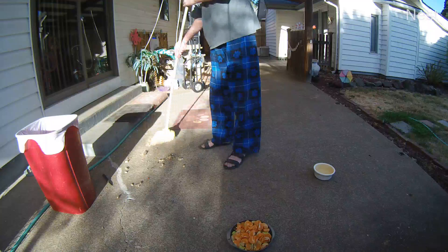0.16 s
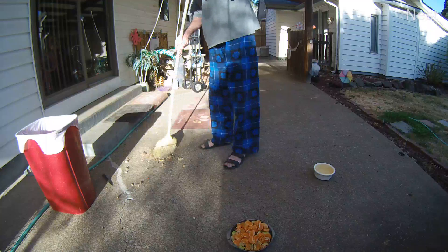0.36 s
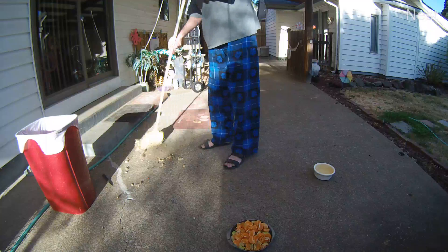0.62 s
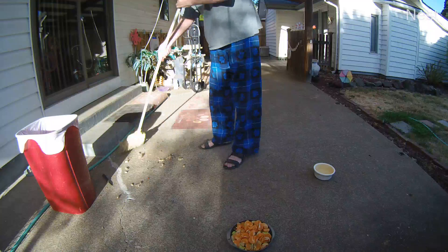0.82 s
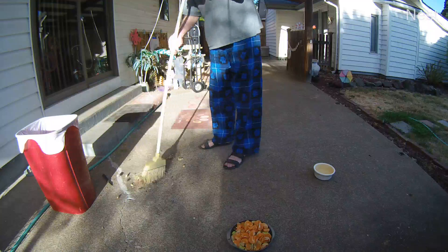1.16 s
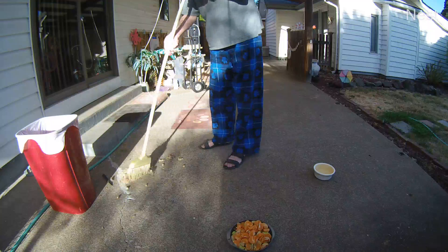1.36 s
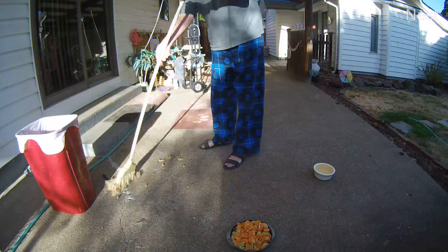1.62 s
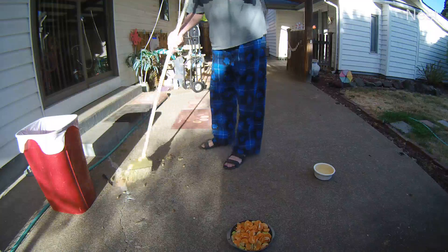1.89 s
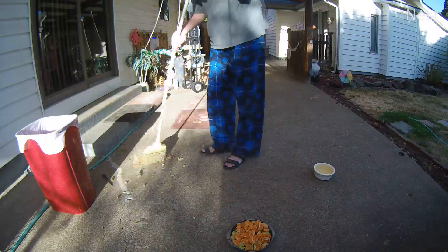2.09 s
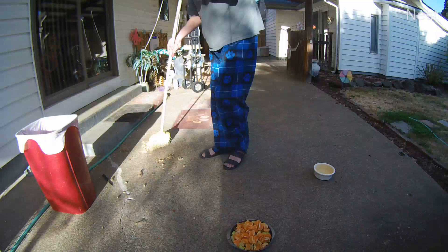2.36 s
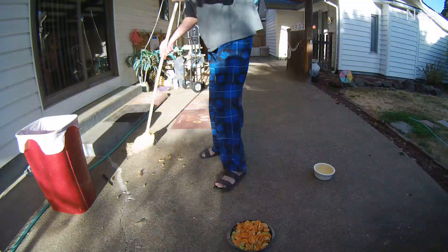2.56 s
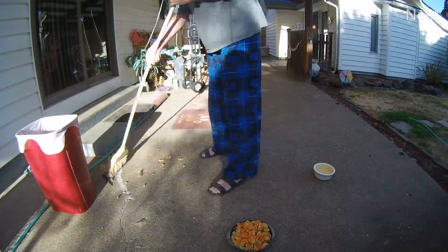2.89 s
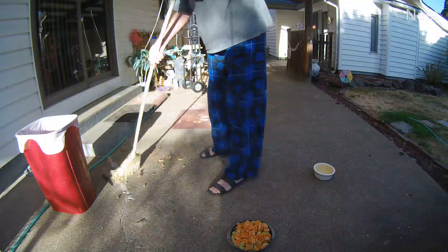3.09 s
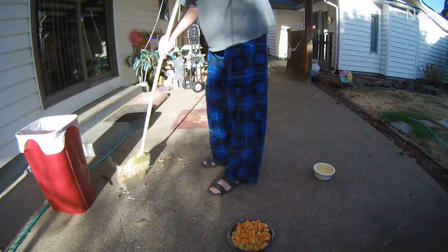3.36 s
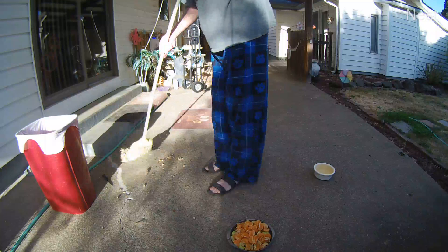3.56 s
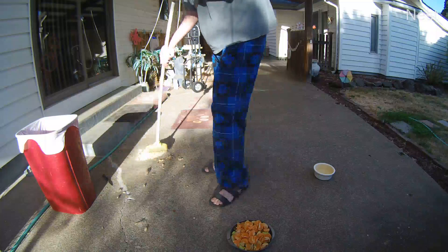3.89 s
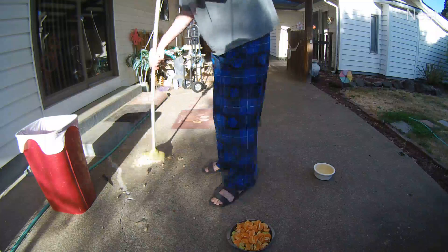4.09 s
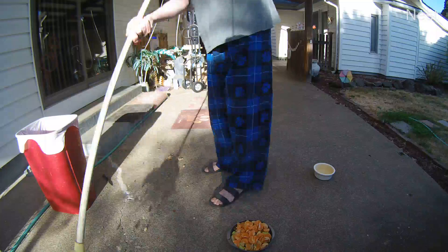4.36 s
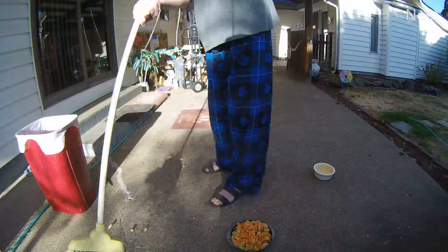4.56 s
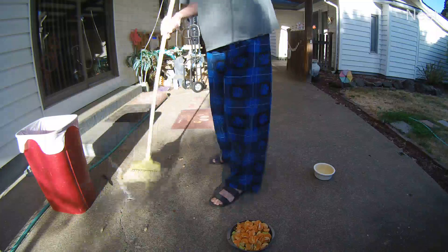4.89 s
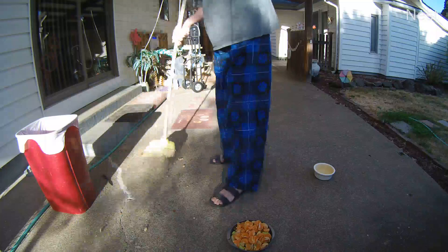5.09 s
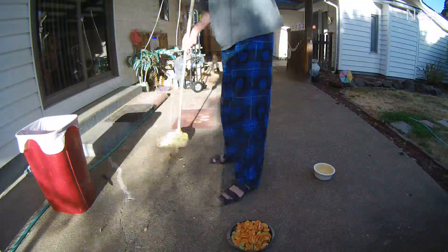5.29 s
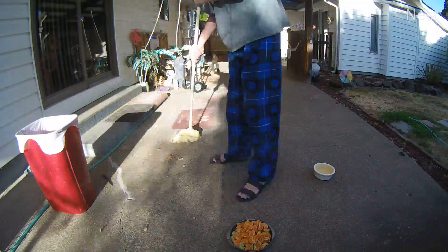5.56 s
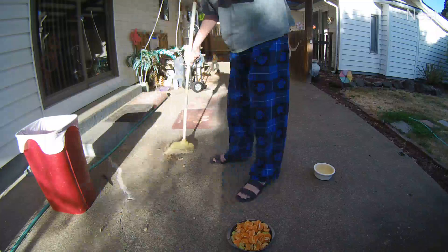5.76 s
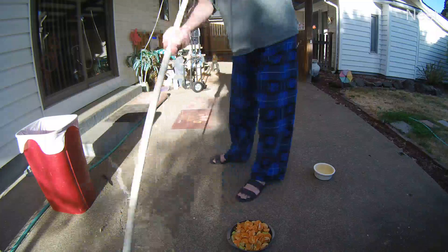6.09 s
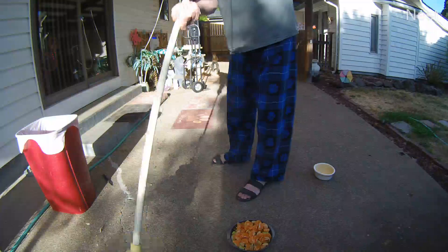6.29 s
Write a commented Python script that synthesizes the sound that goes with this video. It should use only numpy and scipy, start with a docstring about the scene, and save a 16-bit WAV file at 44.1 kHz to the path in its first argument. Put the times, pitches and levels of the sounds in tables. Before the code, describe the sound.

Dry, bright bristle scratches on concrete, first smooth sweeps, then irregular jabs with crackling grit clicks, against a faint airy background.

```python
"""A stiff broom sweeps a concrete patio in four long strokes and many short scuffs.
Stick-slip friction of the bristle tips is noise of tiny impulses, coloured and sent through resonances.
Bits of grit tick and skitter: each strike is a dry crack with a short decaying ring.
Scattered reflections off the house wall and porch roof follow the broom.
Behind lies a soft wash of shaped noise with a faint, wavering hum."""
import sys
import numpy as np
from scipy import signal
from scipy.io import wavfile
from scipy.ndimage import uniform_filter1d

SR = 44100
rng = np.random.default_rng(int(sys.argv[2]) if len(sys.argv) > 2 else 0)


def generate_wav(sig):
    """Save sig (samples, or channels by samples) to the path in sys.argv[1] as 16-bit PCM at SR."""
    pcm = np.round(np.clip(np.atleast_2d(sig).T, -1, 1) * 32767).astype(np.int16)
    wavfile.write(sys.argv[1], SR, pcm)


N = 283563
TIME = np.arange(N) / SR


def gain_of(db):
    """Decibel law: twenty decibels are a factor of ten in amplitude."""
    return 10 ** (np.asarray(db) / 20)


def evened(x):
    """Normalisation: scales a signal to an rms of 1."""
    return x / np.sqrt(np.mean(x ** 2) + 1e-20)


def coloured(x, points, tilt_db=0):
    """Linear filtering: weights the spectrum, with a tilt in dB per octave near 4 kHz, at rms 1."""
    octave = np.log2(np.fft.rfftfreq(len(x), 1 / SR) + 1)
    hz, db = np.transpose(points)
    shape_db = np.interp(octave, np.log2(hz), db)
    shape_db = shape_db + tilt_db * np.clip(octave - np.log2(4000), -1.5, 1)
    return evened(np.fft.irfft(np.fft.rfft(x) * gain_of(shape_db), len(x)))


def wander(rate_hz):
    """Low-pass random modulation: Gaussian noise of rms 1, mostly slower than the given rate."""
    hz = np.fft.rfftfreq(N, 1 / SR)
    spectrum = np.fft.rfft(rng.standard_normal(N))
    return evened(np.fft.irfft(spectrum * np.exp(-(hz / rate_hz) ** 2), N))


# Long pushes of the broom; close rows join into one stroke. Levels are relative. Columns: full pressure t/s,
# hold t/s, rise t/s, release t/s, tip scratch level/dB, resonant ring level/dB, head rush level/dB,
# ring pitch f/Hz (it scales the resonances, against a nominal 4800)
STROKES = [ (0.225, 0.14, 0.145, 0.165, -35.3, -41, -48, 4550),
           (1.055, 0.058, 0.05, 0.112, -32.3, -33.5, -46, 4750),
           (4.23, 0.007, 0.062, 0.018, -33.5, -31, -43, 4720),
           (4.31, 0.02, 0.085, 0.08, -35.7, -33.8, -51.5, 4850),
           (5.9, 0.06, 0.12, 0.115, -30.4, -29, -42, 4850),
           (6.02, 0.026, .012, 0.06, -42, -28.5, -62, 4950)]
# Spectrum of the scratching tips: f/Hz, relative level/dB
SCRATCH_SPECTRUM = [(80, -73), (300, -55), (900, -27.5), (1600, -7.3), (2300, -3.5), (2600, 0), (3200, 1.5),
                    (3900, 4), (4120, -6), (4350, 4), (5350, 2), (5520, -9), (5700, -1), (6000, -0.5),
                    (6750, -2.5), (6930, -8.5), (7400, -13), (7700, -35.5), (8700, -52)]
# Spectrum of the rush of the broom head: f/Hz, relative level/dB
RUSH_SPECTRUM = [(60, -71), (300, -30), (520, -16), (670, 1), (820, 4.5), (1050, -1), (1400, -7),
                 (2200, -12.5), (4000, -30.5)]
RAMP_DB = 12  # the level changes by this much in one rise or release time
RISE_CURVE, RELEASE_CURVE = 1.38, 1.56  # above 1: rounded shoulders
STROKE_PATCH_DB = 6.5


def strokes(scratch_db=-3.0, rush_db=-1.27, ring_db=-3):
    """Stick-slip friction: slips scratch, excite resonances and shake the head as pressure comes and goes."""
    levels = np.zeros((3, N))
    for s, hold, rise, release, *layer_db, _ in STROKES:
        landing = np.maximum(s - TIME, 0) / rise
        lifting = np.maximum(TIME - s - hold, 0) / release
        pressure_db = -RAMP_DB * (landing ** RISE_CURVE + lifting ** RELEASE_CURVE)
        levels += gain_of(layer_db)[:, None] * gain_of(np.maximum(pressure_db, -120))
    scratch_level, ring_level, rush_level = levels
    tips = slips(per_s=10000, spread_db=2.7, clump_db=.9)
    catching = gain_of(1.0 * wander(300))  # rapid unevenness as the tips catch
    scratch = coloured(shifting(tips, STROKE_PATCH_DB), SCRATCH_SPECTRUM)
    scratch = gain_of(scratch_db) * scratch_level * scratch * catching
    ring = gain_of(ring_db) * ring_level * ringing(shifting(tips, STROKE_PATCH_DB)) * catching
    rush = gain_of(rush_db) * rush_level * coloured(tips, RUSH_SPECTRUM)
    return scratch + ring + rush


def slips(per_s, spread_db, clump_db):
    """Random impulse train: bristle tips let go, most of them weakly, and tufts let go together."""
    sign = rng.choice([-1., 1.], N)
    size = gain_of(spread_db * np.minimum(rng.exponential(1, N), 4))
    happens = rng.random(N) < per_s / SR
    clumping = gain_of(clump_db * wander(130))
    return evened(sign * size * happens * clumping)


def shifting(x, depth_db):
    """Time-varying filtering: narrow peaks and dips in the spectrum come and go at random."""
    z = signal.stft(x, nperseg=2048, noverlap=1536)[2]
    patches = uniform_filter1d(rng.standard_normal(z.shape), size=4, axis=0)  # across frequency
    patches = evened(uniform_filter1d(patches, size=8, axis=1))  # across time
    patch_db = depth_db * np.minimum(patches, 1.3)
    return evened(signal.istft(z * gain_of(patch_db), nperseg=2048, noverlap=1536)[1][:N])


# Resonances colouring the scratch, near 4.8 kHz, before their drift:
# centre f/Hz, width of each of two equal poles f/Hz, relative level/dB
RESONANCES = [(3810, 330, -2), (4390, 140, 2.5), (4600, 250, 7.5), (4864, 220, 8.5), (5060, 200, 7.5),
              (5575, 410, -1)]
NOMINAL_HZ = 4800
DRIFT, DRIFT_HZ = .014, 9.2  # rms share of the drift, and roughly its fastest rate


def ringing(x):
    """Resonance: drifting narrow-band modes respond to x, their pitch shifting from stroke to stroke."""
    out, rows = np.zeros(N), np.array(STROKES)
    pitch_ratio = np.interp(TIME, rows[:, 0], rows[:, -1]) / NOMINAL_HZ
    for hz, width, db in RESONANCES:
        mode_hz = hz * pitch_ratio * (1 + DRIFT * wander(DRIFT_HZ))
        turn = np.exp(2j * np.pi * np.cumsum(mode_hz) / SR)
        r = np.exp(-np.pi * width / SR)
        # shift the mode down to 0 Hz, low-pass, and shift it back
        envelope = signal.lfilter([(1 - r) ** 2], [1, -2 * r, r * r], x / turn)
        out += gain_of(db) * (turn * envelope).real
    return evened(out)


# Short scuffs: middle t/s, relative level/dB, Gaussian half length t/s, brightness tilt level/dB per octave
SCUFFS = [ (1.45, -43, 0.019, 4.5), (1.674, -41.5, 0.027, -3.5), (1.769, -46.5, 0.014, 10),
          (1.883, -54, 0.0074, 18), (2.241, -44, 0.024, -6.5), (2.46, -51.5, 0.056, -2.5),
          (2.728, -35, 0.019, -2), (2.79, -52, 0.016, -9), (3.065, -45, 0.032, -2.5),
          (3.17, -39, 0.039, -4), (3.26, -39, 0.037, -3), (3.569, -43, 0.024, -3),
          (3.705, -45, 0.017, -0.5), (3.819, -43, 0.014, 11.5), (3.998, -34.5, 0.014, -4.5),
          (4.23, -36, 0.0096, -11.5), (4.466, -46, 0.015, 9), (4.543, -34.5, 0.009, 5.5),
          (4.65, -43, 0.025, -1.5), (4.731, -36.5, 0.02, 1), (4.843, -43, 0.005, -6),
          (5.005, -43.5, 0.011, 2), (5.074, -41.5, 0.022, 25), (5.339, -41, 0.03, 1),
          (5.405, -44, 0.0073, 7), (5.612, -36, 0.012, -3), (5.638, -34, 0.016, -3.5),
          (6.279, -43, 0.005, -9), (6.384, -42, 0.006, -7), (6.33, -52, 0.016, 2),
          (6.428, -44.5, 0.0071, -5)]
# Spectrum of a scuff before its tilt: f/Hz, relative level/dB
SCUFF_SPECTRUM = [(60, -87.5), (250, -30), (700, -20.5), (1250, -17), (1650, -10), (2300, -7), (3600, -1),
                  (4200, 0.5), (4800, 4), (5250, 0.5), (5550, -6), (6300, -6.5), (6780, -7), (6950, -16),
                  (7500, -30.5), (8700, -50.5)]
SCUFF_PATCH_DB = 7
SAND_DB = -7  # sand crackling under a scuff, against its scrape
DRAG_DB, DRAG_S = -8, 0.079  # start level and decay time constant of the dragging bristles


def scuffs(level_db=-3.0, swell=0.84, fade=1.0):
    """Transient friction: bristles land quickly, lift a little more slowly, then drag on and die away."""
    tips = shifting(slips(per_s=9000, spread_db=2.5, clump_db=0), SCUFF_PATCH_DB)
    tips = tips * gain_of(0.28 * wander(200))
    sand = pings(per_s=700, t60=.02)
    out = np.zeros(N)
    for s, db, half, tilt_db in SCUFFS:
        near = (TIME > s - .15) & (TIME < s + .3)
        t = TIME[near] - s
        dab = np.exp(-(t / (half * np.where(t < 0, swell, fade))) ** 2 / 2)
        drag = (t > 0) * gain_of(DRAG_DB) * np.exp(-abs(t) / DRAG_S)
        contact = np.maximum(dab, drag)
        scrape = coloured(tips[near], SCUFF_SPECTRUM, tilt_db)
        scuff = evened((scrape + gain_of(SAND_DB) * sand[near]) * contact)
        out[near] += gain_of(db + level_db) * scuff * np.sqrt(np.mean(contact ** 2))
    return out


# Light contact between strokes: t/s, relative level/dB
TRAIL = [(0, -57), (.6, -56.5), (.95, -55), (1.25, -45.5), (1.4, -51), (1.551, -51.5), (2, -50),
         (2.151, -58.5), (2.95, -58.5), (3.2, -50), (3.35, -54), (3.4, -48), (3.5, -54.5), (3.62, -46),
         (3.67, -51.5), (3.78, -53), (3.88, -41.5), (3.961, -50.5), (4.1, -53), (4.45, -52.5), (4.6, -48),
         (4.82, -50), (4.88, -43), (4.97, -53.5), (5.14, -60), (5.22, -54.5), (5.751, -56), (6.15, -54),
         (6.22, -59), (6.43, -57)]
# Spectrum of light brushing, which also weights the pings: f/Hz, relative level/dB
TRAIL_SPECTRUM = [(100, -75.5), (1000, -32), (2300, -5.5), (3600, -3), (4300, 1), (4800, 4.5), (5250, -1.5),
                  (5500, -11), (6700, -7), (7200, -31), (8700, -65.5)]
TRAIL_PATCH_DB = 6.5


def trail(level_db=-5.5, ring_db=-9, crackle_db=-5):
    """Light friction: a few bristles brush on and roll sand as the broom is moved, with a faint ring."""
    s, db = np.transpose(TRAIL)
    tips = shifting(slips(per_s=5000, spread_db=2.2, clump_db=1), TRAIL_PATCH_DB)
    sand = pings(per_s=550, t60=.03)
    touch_db = np.interp(TIME, s, db) + 1.5 * wander(25)
    brushing = coloured(tips, TRAIL_SPECTRUM)
    brushing = brushing + gain_of(ring_db) * ringing(tips) + gain_of(crackle_db) * sand
    return gain_of(touch_db + level_db) * brushing


PING_LOW_HZ, PING_HIGH_HZ, PING_ATTACK_S = 2600, 6205, .0006


def pings(per_s, t60, count=24):
    """Free vibration: bristles and sand grains snap free, each ringing briefly at one of a set of pitches."""
    t, out = np.arange(2048) / SR, np.zeros(N)
    size = gain_of(3 * np.minimum(rng.exponential(1, N), 3)) * (rng.random(N) < per_s / SR)
    which = rng.integers(0, count, N)
    for k, hz in enumerate(np.geomspace(PING_LOW_HZ, PING_HIGH_HZ, count)):
        decay = gain_of(np.interp(hz, *np.transpose(TRAIL_SPECTRUM)) - 60 * t / t60)
        attack = 1 - np.exp(-(t / PING_ATTACK_S) ** 2)
        ping = np.sin(2 * np.pi * hz * t) * decay * attack
        out += signal.oaconvolve(size * (which == k), ping)[:N]
    return evened(out)


# Bits of grit flicked by the bristles and striking the concrete: onset t/s, relative peak level/dB,
# ring f/Hz, dry crack against the ring level/dB, ring decay to -60 dB t/s
GRIT = [ (1.101, -22, 4940, 3, .02), (1.277, -38, 3800, 0, .02), (1.312, -40, 4400, 0, .02),
        (1.38, -38, 4670, -4, .018), (1.449, -37, 4900, -2, .015), (1.669, -41.5, 4600, 4, .02),
        (3.014, -43, 4500, 3, .02), (3.536, -36.5, 4860, -4, .025), (3.554, -35, 5080, -5, .025),
        (3.568, -31, 5070, -6, .025), (3.692, -34, 4500, 1, .025), (3.697, -37, 4720, -3, .025),
        (3.717, -37, 4820, 0, .02), (3.809, -32.5, 5580, -8, .02), (3.813, -26.5, 4590, -11, .025),
        (3.82, -26.5, 5160, -12, .025), (3.825, -28, 5540, -12, .02), (3.913, -33, 4800, 5, .02),
        (3.921, -34, 4800, 0, .02), (3.975, -32, 4620, 2, .02), (3.988, -26, 3740, -7, .025),
        (3.996, -29, 4800, -3, .02), (4.006, -27, 4700, -4, .02), (4.215, -22, 4750, -5, .02),
        (4.22, -16, 4720, -5, .018), (4.23, -14.5, 4800, -8, .028), (4.24, -21, 4640, -6, .025),
        (4.329, -21, 5170, -3, .015), (4.456, -36, 5080, -3, .02), (4.465, -34, 4700, 1, .02),
        (4.513, -32, 4170, -2, .02), (4.526, -28.5, 4030, -14, .025), (4.536, -28, 4850, -6, .025),
        (4.544, -28, 5270, -9, .025), (4.731, -20.5, 4100, -5, .018), (4.834, -32, 3550, -8, .02),
        (4.842, -20.5, 4820, -14, .028), (4.8435, -25.5, 3100, -10, .02), (4.851, -23, 4780, -14, .016),
        (4.865, -33, 4830, -3, .02), (4.889, -36, 4900, -6, .025), (4.993, -39, 5280, -6, .025),
        (5.002, -35, 4600, -3, .025), (5.054, -26, 5350, 3, .018), (5.061, -31, 4540, 2, .018),
        (5.068, -29, 5500, -1, .02), (5.178, -41, 5070, 3, .015), (5.274, -29, 5080, -11, .022),
        (5.28, -27, 5180, -10, .022), (5.29, -32, 5070, -17, .02), (5.331, -34, 4700, -3, .02),
        (5.356, -30, 4860, -10, .022), (5.368, -34, 4900, -5, .016), (5.409, -37, 4900, -3, .018),
        (5.455, -33, 5180, -3, .022), (5.461, -38, 4370, -9, .022), (5.47, -38, 4800, -9, .02),
        (5.594, -36, 4080, 3, .02), (5.603, -30, 4790, 6, .02), (5.914, -21, 5020, 0, .02),
        (5.923, -14, 4855, 6, .018), (5.932, -17, 5310, 4, .018), (5.964, -19, 4600, 0, .018),
        (5.985, -22, 4850, -3, .02), (6.023, -20, 4600, -6, .022), (6.03, -23, 4900, -8, .02),
        (6.255, -22.5, 5630, 6, .02), (6.256, -31, 6750, -10, .03), (6.2615, -25, 5460, -14, .022),
        (6.2687, -28, 5480, -19, .026), (6.277, -26, 4750, -6, .026), (6.279, -24, 5380, -9, .028),
        (6.29, -26, 5400, -10, .026), (6.303, -39, 5450, -5, .02), (6.312, -43, 3600, -3, .025),
        (6.328, -40, 5750, 0, .025), (6.345, -42, 3600, -5, .025), (6.352, -43, 5100, -5, .025),
        (6.373, -29, 3950, -3, .028), (6.377, -28, 4960, -6, .025), (6.382, -21, 3370, 3, .02),
        (6.388, -26, 3090, -5, .028), (6.391, -30, 3930, -3, .025), (6.403, -26, 3260, -16, .028)]
# Spectrum of the dry crack: f/Hz, relative level/dB
CRACK_SPECTRUM = [(500, -30), (1400, -10.5), (3000, -1), (4800, 4.5), (5600, -0.5), (6800, -0.5),
                  (7500, -32), (8700, -38)]
LONGEST_RING_S, CRACK_T60, CRACK_RISE_S = .035, .012, .001


def grit(side_modes_db=-8.5, level_db=-1.5, attack_s=0.0026, side_hz=4600, top_hz=7000):
    """Impact excitation: a dry crack, and a short ring swelling behind it with weaker, varied side modes."""
    t, out = np.arange(2048) / SR, np.zeros(N)
    for s, db, hz, crack_db, t60 in GRIT:
        ratios = rng.uniform(.72, 1.28, (7, 1))
        mode_hz = np.sqrt(side_hz * hz) * ratios
        modes = evened(np.sin(2 * np.pi * (mode_hz * t + rng.random((7, 1)))).sum(0))
        main_mode = evened(np.sin(2 * np.pi * hz * t))
        swell = (1 - np.exp(-(t / attack_s) ** 2)) * gain_of(-60 * t / min(t60, LONGEST_RING_S))
        ring = (main_mode + gain_of(side_modes_db) * modes) * swell / swell.max()
        crack_decay_db = -60 * np.maximum(t - CRACK_RISE_S, 0) / CRACK_T60
        crack = coloured(rng.standard_normal(len(t)), CRACK_SPECTRUM) * gain_of(crack_db + crack_decay_db)
        tick = ring + crack * np.minimum(t / CRACK_RISE_S, 1)
        add(out, s, gain_of(db + level_db) * tick / abs(tick).max())
    return signal.sosfilt(signal.butter(4, [500, top_hz], "band", fs=SR, output="sos"), out)


def add(mix, s, sound):
    """Superposition: adds a sound to the mix from s seconds on."""
    part = mix[max(round(s * SR), 0):][:len(sound)]
    part += sound[:len(part)]


def patio(x, wet_db=-14, t60=0.043):
    """Diffuse reflection: the house wall and porch roof return sparse, decaying echoes of random sign."""
    t = np.arange(SR // 2) / SR
    echoes = rng.standard_normal(len(t)) * (rng.random(len(t)) < 2000 / SR)
    taps = echoes * (t > .006) * gain_of(-60 * t / t60)
    return x + gain_of(wet_db) * signal.fftconvolve(x, taps / np.linalg.norm(taps))[:N]


# Spectrum of the background wash: f/Hz, relative level/dB
WASH_SPECTRUM = [(30, -42), (65, -20.5), (110, -14.5), (160, -14.5), (220, -5.5), (350, -1), (700, 3),
                 (1100, 3.5), (1600, -1.5), (2400, -9.5), (4000, -19.5), (4900, -18.5), (5600, -30.5),
                 (7500, -52)]
# Level of the background noise, lowered for a moment near the end: t/s, relative level/dB
WASH_LEVEL = [(0, -58), (5.9, -58.5), (6.15, -61), (6.22, -64.5), (6.34, -62), (6.43, -59)]
# Level of the hum: t/s, relative level/dB
HUM_LEVEL = [(0, -76), (.3, -83), (.6, -69.5), (.95, -72), (1.13, -78), (1.35, -69), (3.5, -72.5),
             (5.6, -73), (5.9, -80), (6.43, -74)]
HUM_HZ = 355.6
LOW_BAND_HZ, LOW_BAND_DB = 260, 3.5  # upper edge of the low band, and the scale of its level variation


def background():
    """Noise and tone: a distant wash, its level below 260 Hz varying at random, and some machine's faint hum."""
    wash_db = np.interp(TIME, *np.transpose(WASH_LEVEL)) + .7 * wander(5)
    wash = coloured(rng.standard_normal(N), WASH_SPECTRUM) * gain_of(wash_db)
    low_band = signal.sosfiltfilt(signal.butter(3, LOW_BAND_HZ, fs=SR, output="sos"), wash)
    variation = gain_of(LOW_BAND_DB * np.minimum(wander(9), 1))
    wash = wash - low_band + low_band * variation
    hum = evened(np.sin(2 * np.pi * np.cumsum(HUM_HZ + 0.95 * wander(2.8)) / SR))
    waver = gain_of(1.2 * wander(3))
    return wash + gain_of(np.interp(TIME, *np.transpose(HUM_LEVEL))) * hum * waver


def scene():
    """Superposition: the broom with its patio reflections, over the background, in one channel."""
    broom = strokes() + scuffs() + trail() + grit()
    return (patio(broom) + background())[None]


LOW_CUT_HZ, EDGE_HZ = 150, 8850


def record(dry):
    """Band limitation: a low cut removes the deep bass and a steep low-pass the highest treble."""
    thin = signal.sosfilt(signal.butter(6, LOW_CUT_HZ, "high", fs=SR, output="sos"), dry)
    low_pass = signal.firwin(511, EDGE_HZ, window=("kaiser", 9), fs=SR)
    return signal.oaconvolve(thin, low_pass[None], "same")


dry = scene()
out = record(dry)
generate_wav(out)
```